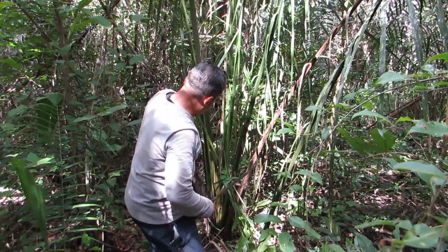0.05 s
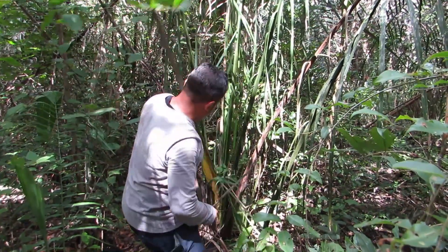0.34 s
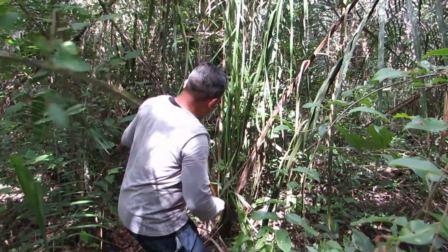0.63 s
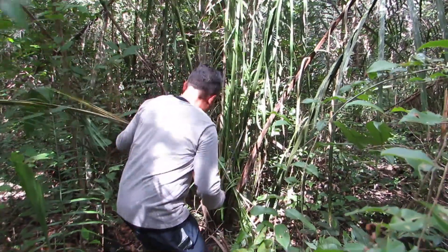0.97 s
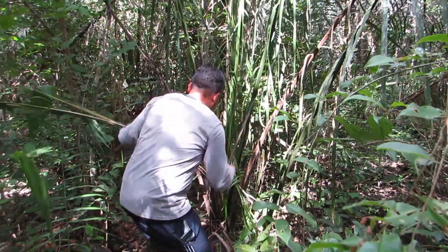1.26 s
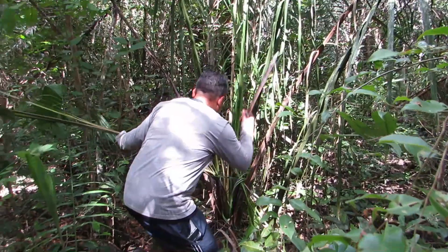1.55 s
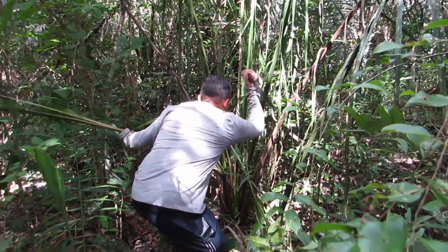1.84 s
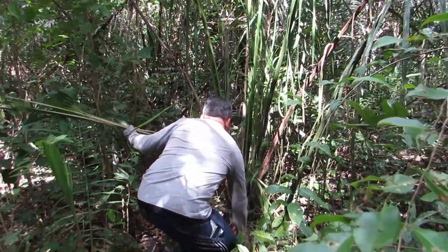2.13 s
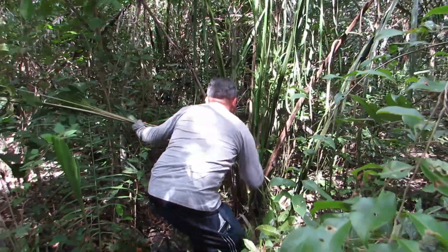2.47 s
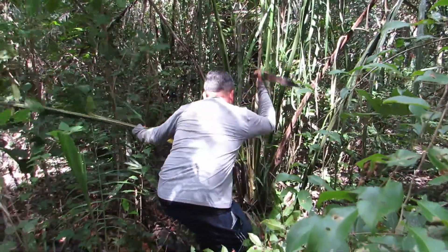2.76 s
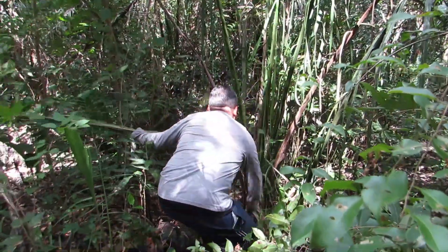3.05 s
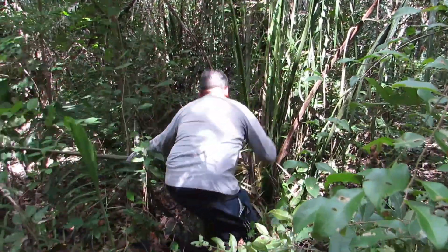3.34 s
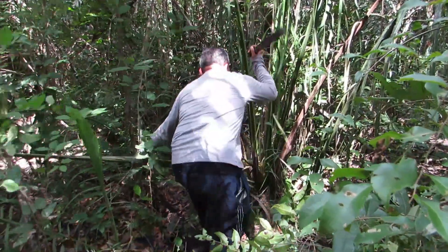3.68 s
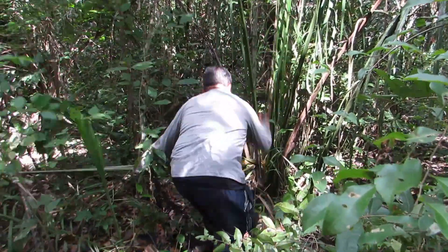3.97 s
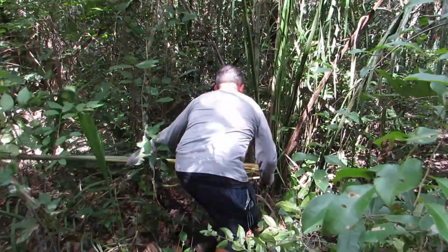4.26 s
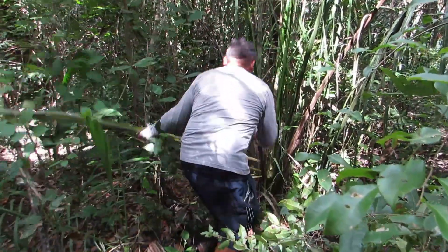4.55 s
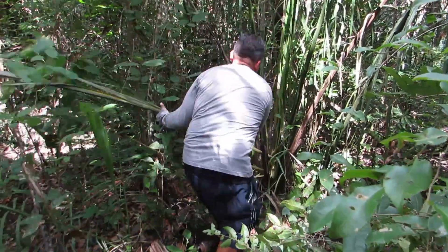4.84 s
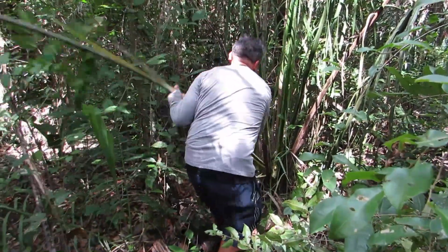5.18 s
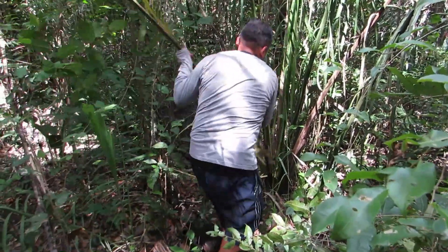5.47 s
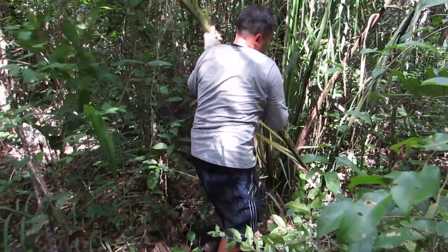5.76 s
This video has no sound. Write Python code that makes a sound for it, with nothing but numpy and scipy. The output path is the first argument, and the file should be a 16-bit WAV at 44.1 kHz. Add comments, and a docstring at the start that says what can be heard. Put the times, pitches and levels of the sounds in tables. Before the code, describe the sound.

Leaves rustle and a twig cracks right at the start as palm fronds are pulled through dense forest brush, a few metres away. More swishes and snaps follow, the sharpest at about 0.7 seconds, with dull stem bumps and feet shifting softly on the litter. The rustle eases toward 2 seconds. A machete then chops into a fresh palm shoot three times, nearly straight ahead, at about 2.1, 3.1 and 4.1 seconds. Each stroke is a quick, wet tear of fibres with a crack and a knock on the stalk; the second thumps most heavily and the third is softer. Trunks and leaves return a short, diffuse echo. Light rustling and small snaps continue between strokes, leaning left. From about 5 seconds the fronds are dragged again, with louder swishing, bumping stems and a run of twig snaps until the end, near 5.9 seconds.

```python
"""Machete in dense forest

A machete chops three times through a fresh palm shoot, a few metres away.
Each stroke tears a run of wet fibres and thumps the stalk; trunks and leaves scatter the sound back.
Between strokes fronds are pulled through the brush: leaves rustle, twigs snap, stems bump, feet shift."""
import sys
import numpy as np
from scipy import signal
from scipy.fft import rfft, irfft, next_fast_len
from scipy.io import wavfile
from scipy.ndimage import map_coordinates

SR = 44100
rng = np.random.default_rng(int(sys.argv[2]) if len(sys.argv) > 2 else 0)


def store_wav(level_fs):
    """Save 16-bit WAV to argv[1]."""
    pcm = np.round(np.clip(np.atleast_2d(level_fs), -1, 1) * 32767)
    wavfile.write(sys.argv[1], SR, pcm.T.astype(np.int16))


N = 260631

# machete strokes: start_s, graze_s, slice_s, split_s, slice_hiss_db, slice_crunch_db, crack_db, split_db,
# bite_db, bite_hz, thud_db, thud_hz, thud_swell_s, ground_db
MACHETE_STROKES = [(2.137, .001, .0058, .0035, -20.5, -22, -9, -25, -22.5, 782, -36, 170, .004, -29.5),
                   (3.064, 0.0058, 0.02, 0.0074, -18.5, -29, -10, -19.5, -15, 2050, -17.5, 293, 0.0027, -30.5),
                   (4.0976, 0.018, .0072, 0.016, -26, -21, -18.5, -20, -16, 2360, -27, 310, .011, -42)]


def amp(db):
    """Decibels to gain."""
    return 10 ** (np.asarray(db) / 20)


def along(points, hz):
    """Read a curve of (Hz, value) points on a log frequency axis."""
    freqs, values = np.transpose(points)
    return np.interp(np.log(hz + 1), np.log(freqs), values)


def wobble(rate):
    """A smooth random curve, rate knots a second."""
    knots = rng.standard_normal(int(N * rate / SR) + 4)
    return map_coordinates(knots, [np.arange(N) * rate / SR])


def filtered(x, response):
    """Filter x by a function of frequency."""
    n = x.shape[-1]
    size = next_fast_len(n + 8192)
    return irfft(rfft(x, size) * response(np.fft.rfftfreq(size, 1 / SR)), size)[..., :n]


def add(track, start_s, sound):
    """Mix a sound into a track."""
    part = track[max(0, round(start_s * SR)):][:len(sound)]
    part += sound[:len(part)]


def panned(db):
    """Left and right gains; positive db leans left."""
    return amp(np.array([[.5], [-.5]]) * db)


def lead(x, seconds):
    """The left channel hears x this much earlier than the right."""
    return filtered(x, lambda hz: np.exp(np.pi * 1j * hz * seconds * np.array([[1], [-1]])))


def widen(pair):
    """Two unrelated signals become a wide stereo pair, alike in the mids, opposed in the bass."""
    # left-right likeness of the pair: freq_hz, correlation
    likeness = [(140, -0.8), (280, -0.35), (550, -0.33), (800, .45), (1400, 0.7), (4500, 0.77),
                (8000, 0.15), (13000, -0.36)]
    angle = lambda hz: np.arccos(np.clip(along(likeness, hz), -1, 1)) / 2
    mid, side = filtered(pair, lambda hz: np.array([np.cos(angle(hz)), np.sin(angle(hz))]))
    return np.array([mid + side, mid - side])


def struck(x, spectrum, modes=(), ring=0, size=2048):
    """Play x through a body of unit energy: a broad spectrum with resonances standing on it."""
    hz = np.fft.rfftfreq(size, 1 / SR)
    peaks = sum(amp(db) / np.hypot(1, 2 * (hz - centre) / width) for centre, width, db in modes)
    magnitude = amp(along(spectrum, hz)) * (1 + ring * peaks)
    cepstrum = irfft(np.log(magnitude))
    cepstrum[1:size // 2] *= 2  # minimum phase keeps the attack sharp
    cepstrum[size // 2 + 1:] = 0
    pulse = irfft(np.exp(rfft(cepstrum)))
    return signal.oaconvolve(x, pulse / np.linalg.norm(pulse))[:N]


def clicks(n, rate, spread_db):
    """Tiny fractures at random moments, log-normal in size, rms 1."""
    impulses = (rng.random(n) < rate / SR) * rng.choice([-1, 1], n)
    crackle = impulses * amp(spread_db * np.clip(rng.standard_normal(n), -2, 2))
    return crackle / np.sqrt(np.mean(crackle ** 2) + 1e-20)


def tear(hold_s, release_s, rate):
    """A run of fractures that holds and then dies away."""
    t = np.arange(SR // 20) / SR
    envelope = np.exp(-np.maximum(t - hold_s, 0) / release_s)
    burst = envelope * clicks(len(t), rate, spread_db=3)
    return burst * np.linalg.norm(envelope) / (np.linalg.norm(burst) + 1e-9)


def knock(hz, swell_s, sag_s=0.05):
    """A knock swells and dies in a few cycles, its pitch sagging as the struck thing gives way."""
    t = np.arange(SR // 8) / SR
    envelope = (t / swell_s * np.exp(1 - t / swell_s)) ** 2
    return envelope * np.sin(2 * np.pi * hz * sag_s * np.log1p(t / sag_s))


def forest(x, blur_octaves=0.11, predelay_s=.004, size=512):
    """Countless trunks and leaves scatter the sound: its energy returns as a diffuse, fading wash."""
    # reverb time among the trees: freq_hz, t60_s
    decay_times = [(100, 0.29), (500, 0.54), (2000, 0.28), (6000, 0.39), (14000, 0.25)]
    frames = dict(nperseg=size, noverlap=size - size // 4)
    hz, t, spectra = signal.stft(x, SR, **frames)
    octaves = np.log2(hz + hz[1])
    blur = np.exp(-.5 * ((octaves[:, None] - octaves) / blur_octaves) ** 2)
    power = blur / blur.sum(1, keepdims=True) @ abs(spectra) ** 2  # many paths even out the colour
    fade = amp(-60 * t[t < .5] / along(decay_times, hz)[:, None]) ** 2
    fade /= fade.sum(1, keepdims=True)
    tail_power = abs(signal.fftconvolve(power, fade, axes=1))[:, :len(t)]
    noise = signal.stft(widen(rng.standard_normal((2, N))), SR, **frames)[2]
    wash = signal.istft(noise / noise.std() * np.sqrt(tail_power), **frames)[1]
    return np.pad(wash, ((0, 0), (round(predelay_s * SR), 0)))[:, :N]


def rustle(spectrum, rate, spread_db, wash_db, clump_db):
    """Leaf contacts come in clumps, over a wash of countless fainter ones; rms 1 in mono."""
    clumps = amp(clump_db * (wobble(28) + wobble(110)))
    near = struck(clicks(N, rate, spread_db), spectrum)
    far = widen(np.array([struck(clicks(N, 9000, spread_db=2.5), spectrum) for _ in range(2)]))
    pair = clumps * (near + amp(wash_db) * far)
    return pair / pair.mean(0).std()


def twig_ticks(rate, centre_hz, decay_cycles, spread_db, count=300):
    """Tiny twigs flick at random, each ringing briefly at its own pitch and place."""
    out, t = np.zeros((2, N)), np.arange(SR // 80) / SR
    draws = rng.random((count, 4))
    starts = np.cumsum(-np.log1p(-draws[:, 0])) / rate
    for start, (_, pitch, size, side) in zip(starts, draws):
        hz = centre_hz * 2 ** (2 * pitch - 1)
        envelope = amp(spread_db * (size ** 2 - 1)) * np.exp(-hz * t / decay_cycles)
        ring = envelope * np.sin(2 * np.pi * hz * t)
        add(out[0], start, ring * (.5 + side))
        add(out[1], start, ring * (1.5 - side))
    return out


def brush(easy_pull_db=-46.5, stem_db_per_db=0.74):
    """Feet press the litter; one pull drags both stems and leaves past each other, mostly to the left."""
    # pull on the fronds and weight of shifting feet: time_s, pull_db, feet_db
    effort = [(0.0, -32, -53.5), (0.16, -39, -53.5), (0.34, -38.5, -51), (0.66, -39, -55), (0.85, -41, -51),
              (1.26, -47, -51), (1.61, -44.5, -54), (1.74, -42.5, -53), (2.07, -44, -55.5),
              (2.35, -49.5, -61.5), (2.6, -51, -59), (3.22, -38, -56), (3.66, -45, -55), (4.54, -44, -58),
              (4.99, -42, -53), (5.5, -34, -53), (5.78, -38.5, -53), (5.9, -40.5, -53)]
    # single fronds dragged past their neighbours: centre_s, half_length_s, stems_db, leaves_db
    swishes = [(0.035, 0.016, -42, -30), (0.078, 0.011, -33, -29.5), (.145, 0.022, -40, -34),
               (.356, 0.0083, -31.5, -32.5), (0.48, 0.0038, -30.5, -34), (.697, 0.02, -46, -34),
               (.743, 0.016, -34.5, -28), (0.95, .012, -37.5, -44), (1.078, 0.011, -34.5, -47),
               (1.137, 0.026, -41, -41.5), (1.468, 0.11, -43, -49), (2.808, 0.057, -44, -42),
               (3.183, .047, -38, -46), (3.561, 0.011, -38.5, -35.5), (5.126, 0.063, -42.5, -35),
               (5.374, 0.025, -39, -32.5), (5.63, 0.056, -36, -35)]
    # where the rustle lies: time_s, left_over_right_db
    bearing = [(0.0, -1.5), (1.38, 6), (2.07, 2.0), (2.12, -1.5), (2.51, 1.5), (5.88, 3), (5.9, 3)]
    # tone of litter underfoot, rubbing stems and brushing leaves: freq_hz, gain_db
    litter_eq = [(20, -9.5), (50, -4.5), (110, 0.5), (170, -2), (310, -0.5), (480, -4.5), (900, -16),
                 (3000, -51)]
    stem_eq = [(200, -20), (520, -4), (850, .5), (1150, -1.5), (1600, 0), (2200, -1.5), (3400, -1.5),
               (5000, -8.5), (12000, -40)]
    leaf_eq = [(1500, -26), (3400, -9.5), (4600, -5), (7000, -2), (10000, -4), (13000, -6), (14400, -14),
               (15500, -40)]
    t = np.arange(N) / SR
    times, *controls = np.transpose(effort)
    pull_db, feet_db = [np.interp(t, times, control) for control in controls]
    leaf_gain = amp(pull_db)
    stem_gain = amp(easy_pull_db + stem_db_per_db * (pull_db - easy_pull_db))
    for centre, half, stem_db, leaf_db in swishes:
        near = abs(t - centre) < 3 * half
        swell = np.exp(-.5 * ((t[near] - centre) / half) ** 2)
        stem_gain[near] = np.hypot(stem_gain[near], amp(stem_db) * swell)
        leaf_gain[near] = np.hypot(leaf_gain[near], amp(leaf_db) * swell)
    litter = amp(feet_db + 2.5) * rustle(litter_eq, rate=90, spread_db=3.5, wash_db=16.5, clump_db=1.9)
    rubbing = amp(-0.69) * rustle(stem_eq, rate=160, spread_db=8.5, wash_db=9.5, clump_db=1.2)
    flicks = amp(12.5) * twig_ticks(rate=38, centre_hz=3680, decay_cycles=3.8, spread_db=16)
    stems = stem_gain * (rubbing + flicks)  # harder pulls flick harder
    leaves = leaf_gain * rustle(leaf_eq, rate=190, spread_db=6, wash_db=10, clump_db=.6)
    side_db = np.interp(t, *np.transpose(bearing))
    return (litter * panned(-0.85)
            + lead(stems * panned(side_db), 30e-6)
            + lead(leaves * panned(0.2 * side_db), 13e-6))


def brush_knocks(crunch_db=-42.5):
    """Each knock in the brush is shorter the higher it is, and comes with a dull crunch."""
    # stems bumping, a snapped twig ringing, a low foot stamp: start_s, level_db, pitch_hz
    knock_events = [(.009, -15.5, 1930), (.672, -38, 373), (.733, -33, 320), (1.075, -31, 550),
                    (1.086, -31.5, 330), (1.415, -34, 484), (5.275, -30, 333), (5.312, -27, 870),
                    (5.321, -34, 160), (5.323, -28, 273), (5.645, -27.5, 800)]
    # tone of their crunch: freq_hz, gain_db
    crunch_eq = [(70, -9), (300, 1.5), (700, 1), (2000, -14), (6000, -40)]
    knocks, crunch = np.zeros((2, N))
    for start, db, hz in knock_events:
        add(knocks, start, amp(db) * knock(hz, swell_s=.0011 + 0.65 / hz))
        add(crunch, start, amp(crunch_db) * tear(.006, release_s=0.013, rate=2500))
    return knocks + struck(crunch, crunch_eq)


def twig_snaps(plain_snap_s=.0016, halving_db=9, woody_db=-3, rib_db=-7, crisp_db=-1):
    """A snap is a very short tear through twig, leaf rib and dry leaf; crisp ones are thin and short."""
    # twigs and ribs breaking: start_s, level_db, crispness_db (below 0 woody), left_over_right_db
    snaps = [(.009, -23, -3.5, -1), (0.132, -28, 0, -1), (.149, -31.5, 0.5, 0), (.474, -27, 5, .5),
             (.667, -22.5, 7, 1), (.7, -26, 5.5, 2), (.73, -15, 4.5, 1), (1.01, -36.5, -6.5, 11),
             (1.167, -32.5, -1.5, 11), (1.819, -33.5, 1, 8), (2.789, -40, 4, 1), (3.159, -30, 5, 1),
             (3.989, -25, 9.5, 8.5), (4.356, -30.5, 6.5, 6), (4.522, -32.5, -2.5, 1), (4.533, -32.5, 5, 0),
             (5.293, -25, 2, -1), (5.325, -20.5, -1.5, -1), (5.407, -26.5, 9, -2), (5.458, -29.5, 6, 9),
             (5.492, -29.5, 1.5, 12), (5.645, -23.5, 1.5, .5), (5.743, -30, 2, 8), (5.776, -30.5, 1.5, 8)]
    # tone of woody twig, leaf rib and dry leaf: freq_hz, gain_db
    twig_eq = [(150, -6.5), (600, -12), (1500, -0.5), (2800, 3), (4500, -8), (9000, -48)]
    rib_eq = [(1500, -17), (3500, -2), (5500, 8), (7200, -12), (10000, -17), (15000, -22)]
    dry_leaf_eq = [(3000, -12.5), (6000, 3.5), (9000, 6.5), (12000, 7.5), (15500, -39)]
    tracks = np.zeros((2, 3, N))
    for start, db, crispness_db, side_db in snaps:
        length = plain_snap_s * .5 ** (crispness_db / halving_db)
        parts = [amp(woody_db - crispness_db) * tear(length, release_s=0.0026, rate=7000),
                 amp(rib_db) * tear(length, release_s=0.0048, rate=9000),
                 amp(crisp_db + crispness_db) * tear(0.38 * length, release_s=0.0013, rate=16000)]
        for channel, gain in zip(tracks, panned(side_db)):
            for track, part in zip(channel, parts):
                add(track, start, amp(db) * gain * part)
    return np.array([struck(woody, twig_eq) + struck(ribs, rib_eq) + struck(crisp, dry_leaf_eq)
                     for woody, ribs, crisp in tracks])


def stalk_thuds(break_db=-14.5, break_hz=2420, swell_cycles=2.34, ground_hz=130, ground_lag_s=0.0141):
    """The blade knocks the stalk going in and breaking through; it thuds, and roots shake the soil."""
    out = np.zeros(N)
    for start, _, slice_s, *_, bite_db, bite_hz, thud_db, thud_hz, swell_s, ground_db in MACHETE_STROKES:
        gives_way = start + slice_s - 0.00184  # just ahead of the crack
        add(out, start, amp(bite_db) * knock(bite_hz, swell_cycles / bite_hz))
        add(out, gives_way, amp(break_db) * knock(break_hz, swell_cycles / break_hz))
        add(out, gives_way, amp(thud_db) * knock(thud_hz, swell_s))
        add(out, gives_way + ground_lag_s, amp(ground_db) * knock(ground_hz, swell_s=0.0073))
    return out


def machete_chops(graze_hiss_db=-35, graze_crunch_db=-38, crack_s=0.0015):
    """The blade tears wet fibres: they hiss, and the deeper ones crunch and ring the stalk."""
    # tone of the fibres' hiss and crunch: freq_hz, gain_db
    hiss_eq = [(1500, -38), (3600, -15), (4800, -4), (7000, -4), (9200, 7.5), (12800, 4.5), (14400, -5),
               (15500, -19)]
    crunch_eq = [(60, -10.5), (350, -4.5), (1000, -9.5), (2200, -2), (3500, -2), (6800, 0), (9000, -6),
                 (15000, -53)]
    # resonances of the wet stalk: pitch_hz, width_hz, gain_db
    stalk_modes = [(470, 160, -5), (840, 86, 8), (1380, 240, 7.5), (1730, 270, -6.5), (2460, 380, -9),
                   (3200, 400, -7), (5450, 550, -8)]
    hiss, crunch = np.zeros((2, N))
    for start, graze_s, slice_s, split_s, *settings in MACHETE_STROKES:
        slice_hiss_db, slice_crunch_db, crack_db, split_db = settings[:4]
        stages = [(start - graze_s, graze_s, graze_hiss_db, graze_crunch_db),  # grazes the outer leaves
                  (start, slice_s, slice_hiss_db, slice_crunch_db),  # slices in
                  (start + slice_s, crack_s, crack_db, crack_db - 2.5),  # cracks the core
                  (start + slice_s, split_s, split_db, split_db - 1.5)]  # splits the remaining fibres
        for onset, length, hiss_db, crunch_db in stages:
            add(hiss, onset, amp(hiss_db) * tear(length, release_s=0.0011, rate=15000))
            add(crunch, onset, amp(crunch_db) * tear(length, release_s=0.0025, rate=9000))
    return struck(hiss, hiss_eq) + struck(crunch, crunch_eq, stalk_modes, ring=0.58)


def scene():
    """The blade works nearly straight ahead; trunks and leaves answer every blow."""
    blade, twigs = machete_chops(), twig_snaps()
    knocks = stalk_thuds() + brush_knocks()
    direct = lead(blade + knocks, -16e-6) * panned(-0.8) + lead(twigs, 8e-6)
    reverb_send = amp(-3.5) * blade + amp(-2.0) * twigs.mean(0) + amp(-8.0) * knocks
    return direct + forest(reverb_send) + brush()


def record(dry, top_hz=15700):
    """Two narrow dips in the treble, a hard clip at full scale and a high cut."""
    # treble notches: centre_hz, width_hz, depth (0-1)
    notches = [(3970, 284, 0.73), (8030, 220, 1)]
    dips = lambda hz: np.prod([1 - depth * np.exp(-(2 * (hz - centre) / width) ** 2)
                               for centre, width, depth in notches], axis=0)
    clipped = np.clip(filtered(dry, dips), -1, 1)
    return filtered(clipped, lambda hz: hz < top_hz)


dry = scene()
out = record(dry)
store_wav(out)
```